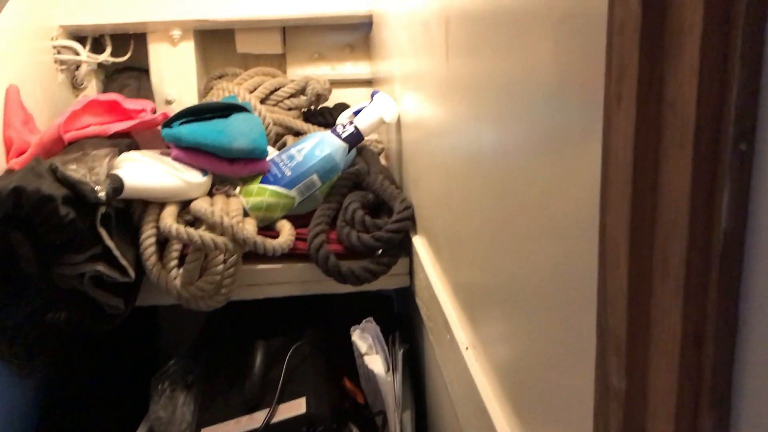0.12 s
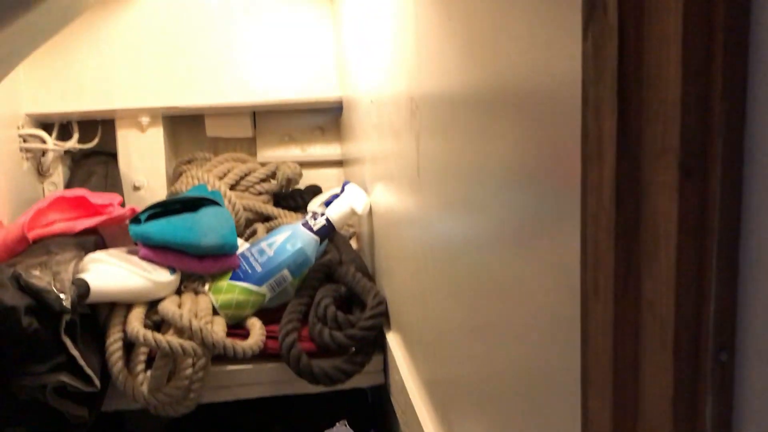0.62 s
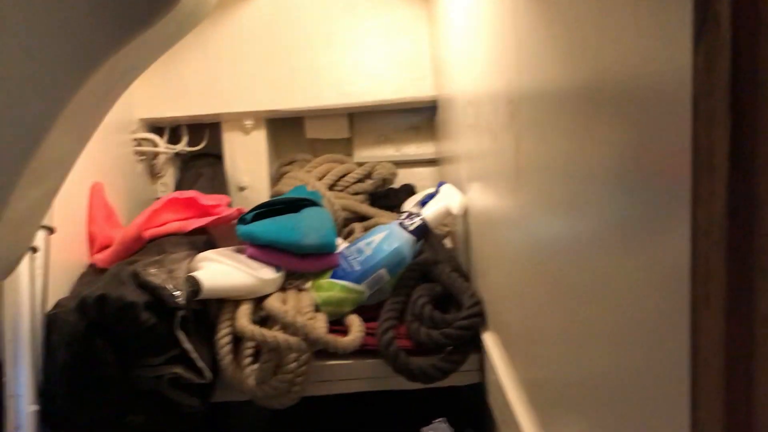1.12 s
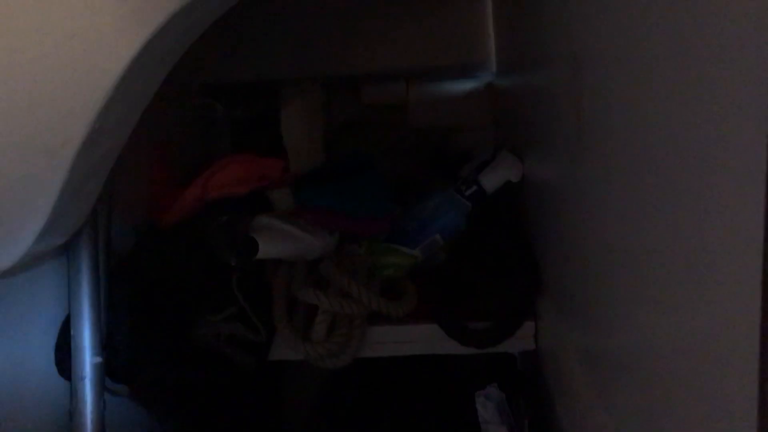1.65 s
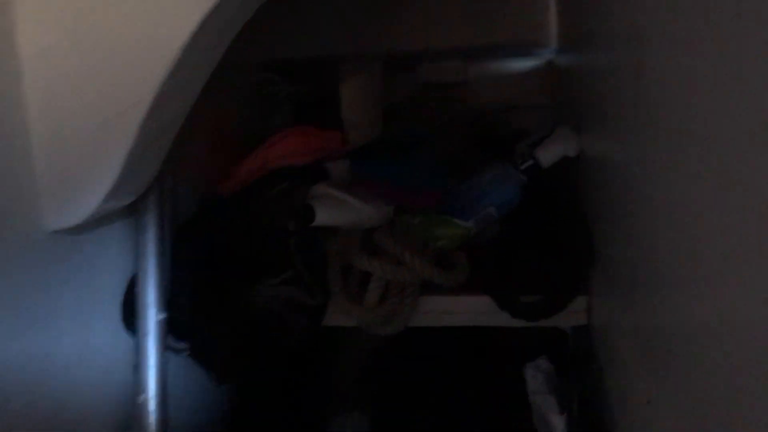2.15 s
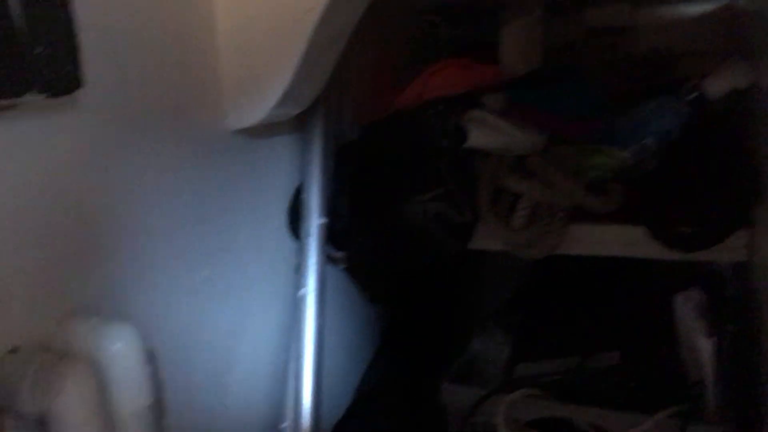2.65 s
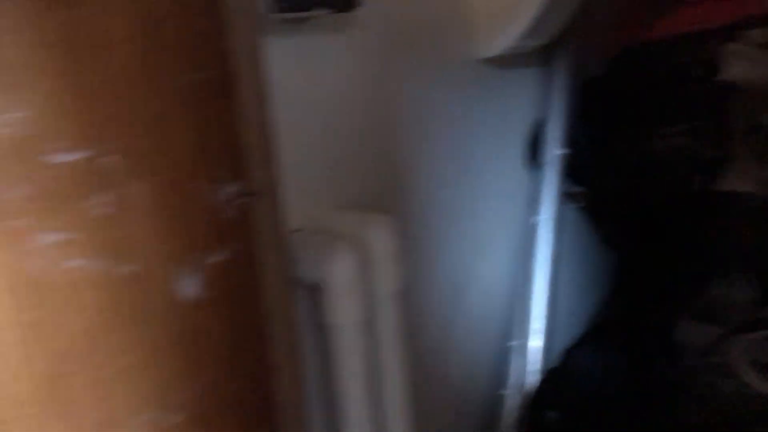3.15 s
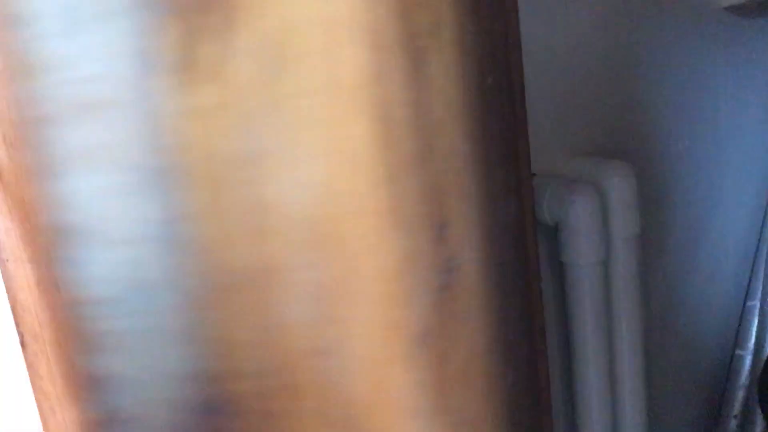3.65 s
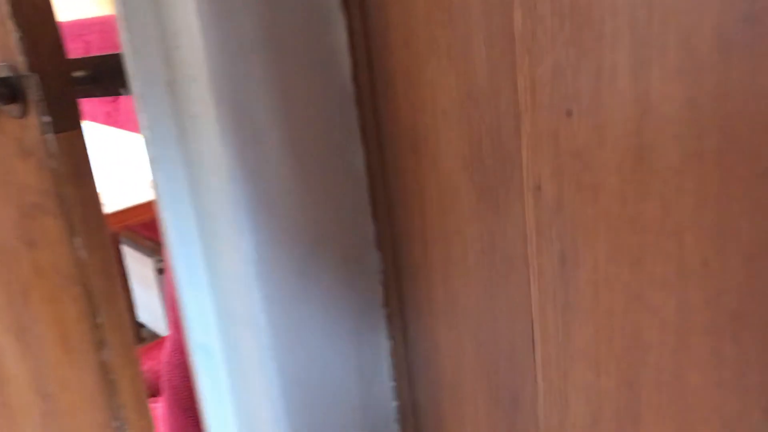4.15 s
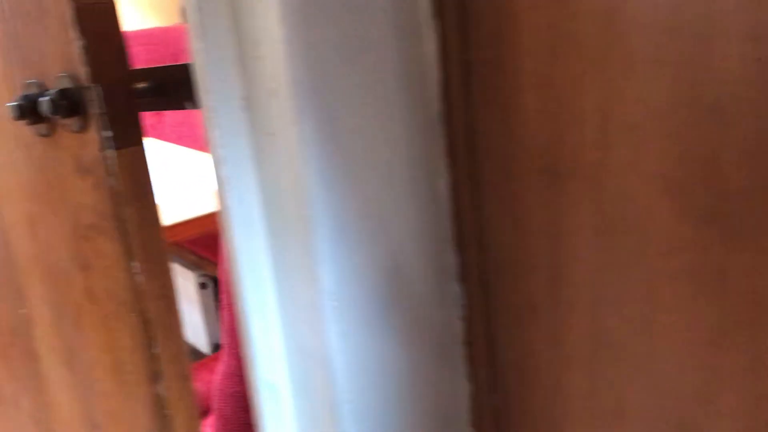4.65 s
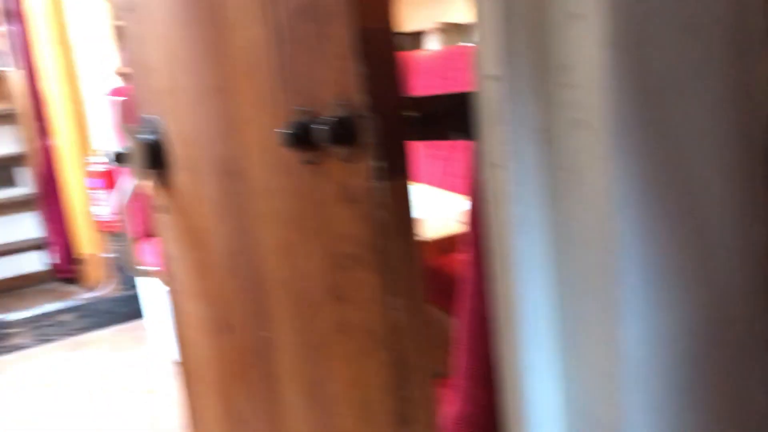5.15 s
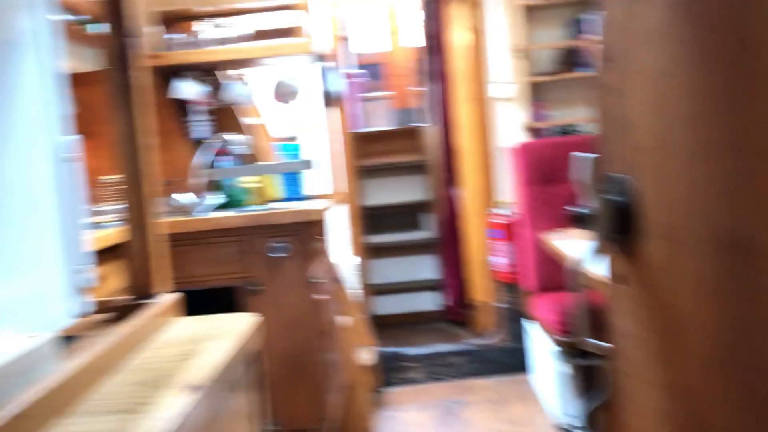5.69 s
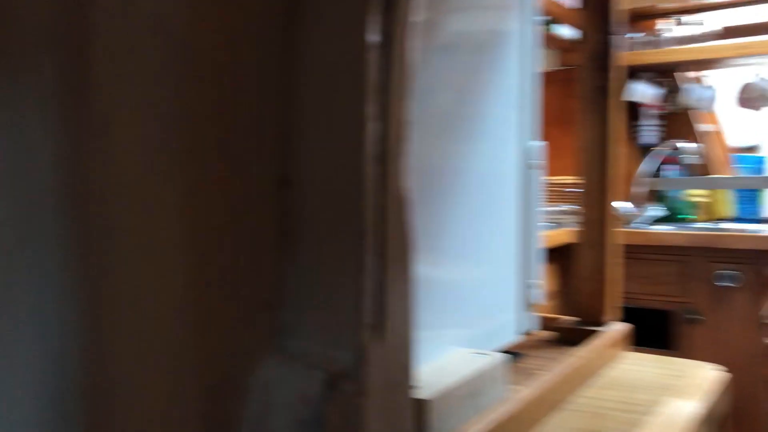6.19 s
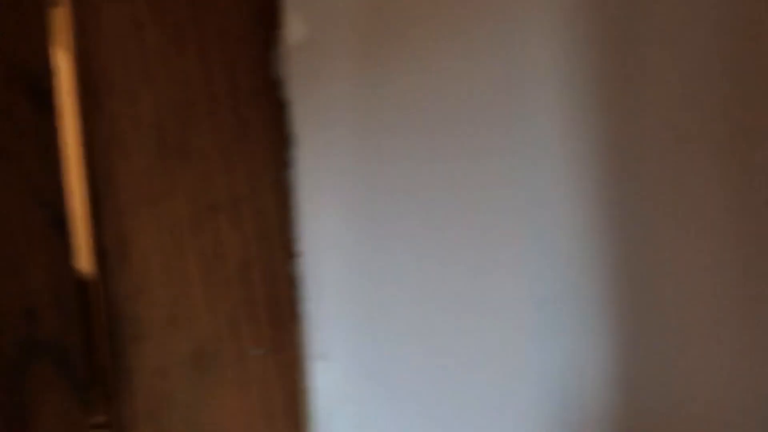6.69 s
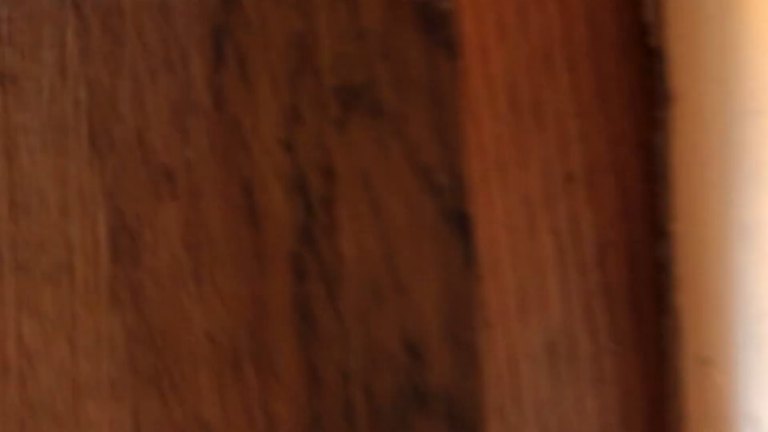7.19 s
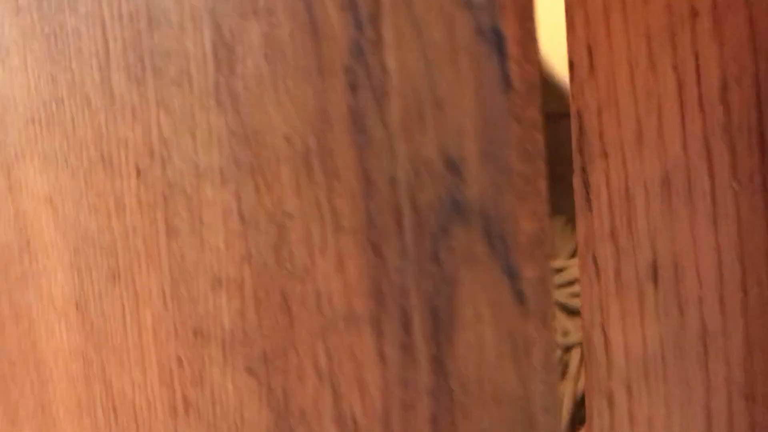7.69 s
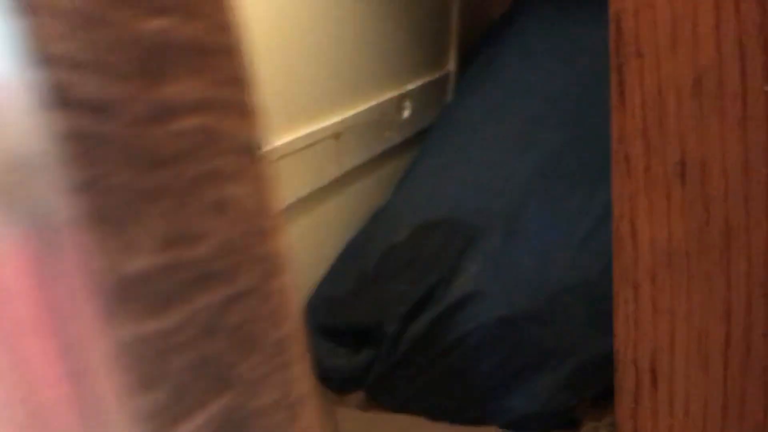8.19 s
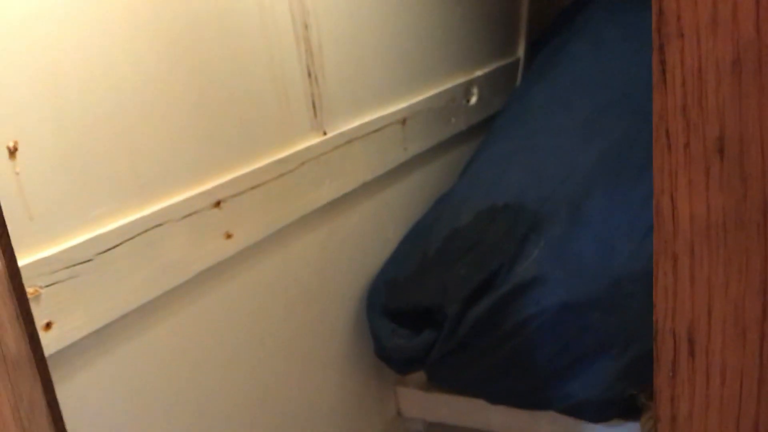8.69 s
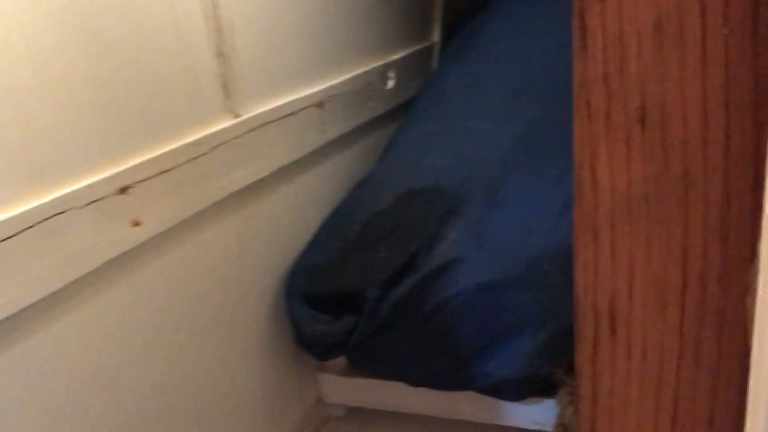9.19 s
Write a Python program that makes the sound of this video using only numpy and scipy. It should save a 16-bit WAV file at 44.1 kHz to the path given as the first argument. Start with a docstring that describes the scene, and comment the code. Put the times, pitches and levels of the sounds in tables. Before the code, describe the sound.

In a cramped wooden boat cabin, a light switch clicks, then doors bang and thud heavily, with rattles, fumbling knocks and a locker creaking open.

```python
"""Knocks and clicks of doors, a light switch, latches and joinery in a cramped wooden boat cabin: noise
bursts shaped by the wood's resonances, plus decaying modes of the door or locker. Panels thud as damped
sines; rubbing, scraping, cloth, rattle after some blows and shifting weight are coloured noise under
gain curves. A wavering mains hum of four sines and the microphone's hiss lie underneath."""
import sys
import numpy as np
from scipy import signal
from scipy.fft import rfft, irfft, next_fast_len
from scipy.io import wavfile
from scipy.ndimage import uniform_filter1d, map_coordinates

SR = 44100
rng = np.random.default_rng(int(sys.argv[2]) if len(sys.argv) > 2 else 0)


def generate_wav(signal):
    """Clip the signal to [-1, 1] and save it as 16-bit WAV at the path in sys.argv[1]."""
    frames = np.transpose(np.atleast_2d(signal))
    scaled = np.clip(frames, -1, 1) * 32767
    pcm = np.round(scaled).astype(np.int16)
    wavfile.write(sys.argv[1], SR, pcm)


def undo_db(level):
    """Turn decibels back into plain size, where 20 dB means ten times bigger."""
    steps = np.asarray(level, float) / 20
    return 10 ** steps


N = 411453

# Weight shifting on the hull. Each row: time in seconds, rumble level in dB.
SHIFTING = [(0, -61), (1.2, -61.5), (2.6, -60), (3.3, -61.5), (4.4, -56), (4.5, -34.5), (4.9, -51.5),
            (5.3, -47.5), (5.7, -51.5), (6.2, -52), (6.9, -42), (7.2, -54.5), (8.2, -59.5), (9.33, -57.5)]
# How busy the hands are. Each row: time in seconds, rubbing level in dB.
HANDLING = [(0, -70.5), (0.4, -75.5), (2.6, -75), (3.4, -70), (4.6, -71), (4.9, -76), (5.2, -72),
            (5.5, -60), (5.85, -65), (6.3, -64.5), (7.1, -64.5), (7.5, -66), (8.3, -70.5), (9.33, -69)]
# Rubbing and swishing strokes, and the rattle that follows some blows. Each row: peak in seconds,
# swell in seconds, fade in seconds, rubbing level in dB, swish level in dB.
STROKES = [(.255, 0.051, 0.18, -73.5, -69), (2.87, 0.069, .15, -73, -72.5), (3.58, .2, .06, -66, -64.5),
           (3.68, 0.049, 0.075, -65, -74), (3.8, 0.036, 0.026, -64, -66), (3.96, 0.037, .04, -69.5, -70),
           (4.03, 0.022, 0.023, -67, -75), (4.16, 0.093, 0.088, -70.5, -64),
           (4.795, .015, 0.096, -60.5, -64.5), (5.04, 0.079, .12, -55, -70), (5.36, .06, .17, -50, -65),
           (6.02, .15, 0.13, -68, -81), (6.145, .012, 0.058, -68, -65), (6.218, .02, .012, -70, -65),
           (6.62, 0.15, .25, -57, -70), (7.709, .05, .05, -68.5, -73), (7.9, .2, .09, -57, -64),
           (8.12, 0.12, .08, -64, -69), (8.84, .04, .07, -61, -60)]
# Spectrum of the hull rumble. Each row: frequency in Hz, relative density in dB per Hz.
RUMBLE_SPECTRUM = [(22, -1), (45, -1.5), (110, 2.5), (160, -8), (270, -8), (340, -14), (600, -42)]
# Spectrum of the rubbing. Each row: frequency in Hz, relative density in dB per Hz.
RUB_SPECTRUM = [(250, -17), (400, 1.5), (1200, -2.5), (2500, -4.5), (5000, -11.5), (8000, -22.5)]
# Spectrum of the swish. Each row: frequency in Hz, relative density in dB per Hz.
SWISH_SPECTRUM = [(3000, -15), (6000, 3), (8000, 3), (10500, 3.5), (12500, 3), (15900, 2.5)]
# Resonances of joinery and fittings. Each row: frequency in Hz, width in Hz, gain in dB.
WOOD_RESONANCES = [(510, 23, 1.5), (657, 12, 5.5), (965, 27, 4), (1200, 350, 1.5), (1597, 33, 2.5),
                   (2130, 400, -1), (2610, 480, -3.5), (3520, 890, 0), (6200, 540, 3), (8700, 600, -1),
                   (12000, 340, -1.5)]
# Mains hum. Each row: frequency in Hz, rms level in dB, change in dB once out of the fore cabin.
HUM = [(48.3, -78.5, 4), (100.3, -66.5, 4.5), (200.2, -66.5, -12.5), (301, -86, 6)]
# Way out of the fore cabin. Each row: time in seconds, share of the way (0 to 1).
LEAVING = [(4.2, 0.0089), (6.5, 1)]
# Spectrum of the microphone hiss. Each row: frequency in Hz, relative density in dB per Hz.
HISS_SPECTRUM = [(300, -5), (600, 9), (1500, -10), (4900, -1), (7000, -21), (10500, -20), (14800, -20),
                 (15900, -22)]
# Thuds into the panels. Each row: start in seconds, relative level in dB, deep pitch in Hz,
# hollow pitch in Hz, relative hollow level in dB.
THUDS = [(0.001, -38.5, 83, 272, -6.5), (0.174, -33, 118.4, 255, -11), (2.064, -41.5, 104, 176, -9),
         (2.6, -31, 45.6, 257, -8), (2.66, -42, 60, 267, -8), (3.85, -40.5, 85, 229, -15),
         (4.471, -4.5, 80.5, 138, -8.5), (4.54, -24, 88.8, 153, -12), (4.592, -15, 72, 145, -18.5),
         (4.647, -19.5, 72, 205, -27), (4.786, -26.5, 111.6, 144, -13.5), (5.031, -30.5, 114, 142, -6.5),
         (5.078, -31, 96, 330, 0), (5.319, -5, 70.5, 137, -18.5), (5.342, -11, 68.6, 165, -12),
         (5.4, -23.5, 61.3, 158, -9), (5.442, -19, 63.3, 142, -28), (5.489, -21, 51.7, 153.5, -15),
         (5.58, -25.5, 80, 152, -15), (5.649, -31.5, 62.6, 150, -20), (5.828, -22.5, 79, 300, -18.5),
         (5.885, -41, 94.2, 142, -3), (6.024, -33.5, 91, 138, -9), (6.087, -40, 86.1, 168, -8),
         (6.234, -25.5, 98, 145, -21), (6.29, -26.5, 66.7, 297, -35), (6.628, -22.5, 99.6, 158, -22),
         (6.667, -31, 96, 143, -36), (6.734, -14.5, 85, 172, -31), (6.786, -32, 81.4, 258, -17),
         (6.828, -28, 83.4, 144.8, -12), (6.884, -12.5, 102.5, 278, -13), (6.949, -41, 86.1, 256, -12),
         (6.99, -40, 117, 151, -3), (7.032, -22.5, 116.4, 155, 1), (7.385, -47, 100, 235, -4),
         (7.432, -35.5, 111, 231, -6), (7.549, -47, 115, 247, -3.5), (7.813, -28.5, 75.6, 320, -22.5)]
# Door and bulkhead panel modes. Each row: frequency in Hz, relative level in dB, free t60 in seconds.
PANEL_MODES = [(48, -7, 0.45), (59.1, 0.5, 0.89), (64.6, 2, 0.56), (80.4, 1.5, 0.42), (88.5, 1, 0.32),
               (97.8, 1.5, 0.35), (125.4, -1, 0.35), (145.2, -0.5, 0.51), (152, 3, 0.17), (205, 12, 0.15),
               (222, -17, 0.11), (270.6, 3.5, 0.28), (320.8, 8, 0.14), (385, -5.5, 0.19)]
# Knocks and clicks. Each row: start in seconds, relative level in dB, relative hollow body level in dB,
# relative metal edge level in dB, strongest ring in Hz.
KNOCKS = [(0.0014, -40.5, 0.5, -24.5, 1063), (0.1788, -43, 5, -34, 1025), (0.37, -51, -30, -20, 970),
          (0.7853, -44, -26, -20, 1390), (0.921, -49.5, -27, -33, 1373), (1.6048, -57, -18, -7, 1640),
          (1.6856, -29.5, -4.5, -19, 1590), (1.8893, -52.5, -12, -19, 1780),
          (2.0643, -35.5, -7, -22.5, 1094), (2.0824, -45.5, -4, -23, 1430), (2.5859, -42, -2.5, -21, 840),
          (2.5943, -36, -8, -44, 1040), (2.6165, -46.5, 0, -17, 1050), (2.6859, -42, -9, -20, 1040),
          (2.7244, -41.5, -3.5, -19.5, 1080), (2.8346, -57.5, -13, -20, 1020), (3.8407, -28, -7, -23, 975),
          (4.2158, -26.5, -20.5, -23, 993), (4.4556, -33, 2.5, -5, 725), (4.4606, -7, -17, -26, 1266),
          (4.4999, -22.5, -3, -25, 1960), (4.7375, -34.5, -8, -24, 848), (4.7864, -37, -12, -28, 976),
          (5.006, -15.5, -16, -16, 4010), (5.0267, -17.5, -6.5, -22.5, 660), (5.048, -19, -2, -8, 601),
          (5.1353, -31.5, -13.5, -30, 659), (5.1915, -45, -22, -20, 1095), (5.2135, -28, -17, -20.5, 1290),
          (5.2988, -21, -5, -20, 657), (5.3434, -18, -7.5, -18, 2000), (5.4263, -43, -1, -22, 620),
          (5.5026, -32, -13, -20.5, 725), (5.5341, -31, -21, -17.5, 1296), (5.581, -27, -18, -15, 1300),
          (5.644, -36, -25, -18, 1310), (5.681, -37.5, -30, -20, 620), (5.7606, -52, -19, -6, 5930),
          (5.791, -39, -36, -20, 2460), (5.8173, -38.5, -4.5, -15.5, 1040), (5.8822, -37.5, 2.5, -2, 600),
          (5.956, -48.5, -20, -11, 726), (6.0011, -39.5, 2, -17, 1380), (6.0392, -34, -3, -22, 926),
          (6.0984, -39, -6.5, -4.5, 763), (6.227, -42.5, -9, -18, 1520), (6.2884, -44, -10, -19, 1474),
          (6.425, -33.5, -15, -10.5, 3170), (6.4507, -25.5, -39, -6.5, 4265), (6.4696, -34, -19, -10, 4460),
          (6.4807, -23.5, -11, -15.5, 1212), (6.589, -26, -14, -2, 9000), (6.627, -39.5, -7, -29, 596),
          (6.68, -43, -30, -16, 4370), (6.7312, -20, -8.5, -18, 1440), (6.779, -34, -4, -36, 610),
          (6.8346, -40, -16, -20.5, 1200), (6.8845, -27.5, -2.5, -43, 1645), (6.8929, -36.5, 0.5, -54, 766),
          (7.0276, -12, -10, -13.5, 1135), (7.0358, -16, -5.5, -15, 663), (7.2623, -34, -15, -17.5, 3630),
          (7.3859, -57.5, 6.5, -16, 1400), (7.486, -56, -18, -11, 4500), (7.5532, -48, -8, -17, 692),
          (7.6092, -44, -10, -36, 1060), (7.6266, -50, -14, -6.5, 740), (7.651, -46, -22, -20, 950),
          (7.7598, -41.5, -18, -14.5, 1680), (7.8888, -41, -30, -12, 740), (8.1272, -41, -15, -15.5, 2150),
          (8.1948, -38, -37, -21, 2265), (8.242, -47.5, -11, -32, 1017), (8.2913, -52.5, -17, -26, 2120),
          (8.839, -40, -26, -12.5, 3000), (9.0668, -52, -26, -21, 2130), (9.1297, -49, -1, -41, 657)]
# Quick repeats of a loose part: a dry creak, then the door rebounding on its stop. Each row: first start
# in seconds, spacing in seconds, first relative level in dB, loss per repeat in dB, ring in Hz.
CHATTER = [(0.4028, .028, -55, 1, 946), (4.5434, .0452, -36, 3, 730)]
# Knock spectrum of the first door. Each row: frequency in Hz, relative density in dB per Hz.
DOOR_SPECTRUM = [(250, 5), (400, 3), (1000, -3.5), (1800, -4.5), (2800, -5), (6000, -16.5), (10000, -23),
                 (16000, -32.5)]
# Knock spectrum of the locker door. Each row: frequency in Hz, relative density in dB per Hz.
LOCKER_SPECTRUM = [(250, 0), (450, -4), (1000, -3), (1800, -0.5), (2800, -2.5), (6000, -12), (10000, -14),
                   (16000, -26.5)]
# Modes of the first door and its frame. Each row: frequency in Hz, relative level in dB, t60 in seconds.
DOOR_MODES = [(454, -20, .12), (601.4, 11, 0.088), (668, -3, 0.45), (810, 0, 0.095), (926, -19, 0.14),
              (1040, 10, 0.16), (1190, 12.5, 0.048), (1337, -16, 0.12), (1576, 4, .1), (1780, 16, 0.057),
              (1960, -11, 0.097), (2366, 8, 0.094), (2800, -13, .06), (3930, -15, 0.036)]
# Modes of the locker door. Each row: frequency in Hz, relative level in dB, t60 in seconds.
LOCKER_MODES = [(448, -11, .12), (657, 8, 0.18), (790, -9, 0.086), (900, -8.5, 0.088), (1040, 10.5, 0.057),
                (1225, 9.5, 0.1), (1187, -21, .1), (1480, -16, 0.093), (1640, 10.5, 0.12),
                (1760, -27, 0.088), (2080, -9, .09), (2480, -9, .07), (2800, -15, .06), (3360, -9, .07),
                (4500, -4, .07)]
# Rubbing and scraping in a narrow band: hands on wood, a scrape or hinge near 8.1 s. Each row:
# peak in seconds, swell in seconds, fade in seconds, level in dB, centre in Hz.
NARROW_RUBS = [(0.43, .08, .12, -77, 1350), (2.9, .08, .2, -76, 1500), (3.45, .15, .15, -74, 760),
               (3.6, .2, .2, -73, 1250), (5.45, .1, .3, -64, 1100), (7.18, .1, .1, -74, 1450),
               (7.6, 0.092, .15, -72, 1500), (7.91, .15, .07, -60, 3100), (8.09, .1, .1, -62, 1300),
               (8.11, .06, .07, -64, 470)]
# Spectrum of the narrow band. Each row: share of the centre pitch, relative density in dB per Hz.
NARROW_SPECTRUM = [(.52, -29), (.78, -3), (1, 2), (1.22, -9), (1.7, -32)]
# Dips of the microphone port. Each row: frequency in Hz, width in Hz, gain in dB.
MIC_DIPS = [(4880, 260, -3.5), (7720, 1040, -2.5), (10430, 950, -6)]

LOCKER_FROM_S = 5.75
# nominal knock t60 at 1 kHz, exponent of its fall with pitch, growth per dB of hollow body
NOMINAL_T60_S, PITCH_DAMPING, HOLLOW_GROWTH_PER_DB = 0.14, 0.23, 0.0045
TICK_LOWEST_DB, TICK_SPREAD_DB, TICK_CENTRE_HZ = -61.5, 4, 1500
# share of the free panel t60 left by a blow at 0 dB, and its growth per dB of a lighter blow
PRESSED_RING, FREER_PER_DB = 0.48, 0.0095
CLOTH_DB, CLOTH_FOLLOWS = -75, 0.47  # cloth level when rubbing is at -69.5 dB; its share of the swings
SWELL_FADE_DB = 16  # fall from the peak over one swell or fade time


def unit(x):
    """Scaled to rms 1 along time."""
    return x / np.sqrt(np.mean(x ** 2, -1, keepdims=True) + 1e-20)


def along(points, hz):
    """Interpolates (Hz, value) points on a log frequency axis."""
    f, v = np.transpose(points)
    return np.interp(np.log(hz + 1), np.log(f + 1), v, right=-120)


def bumps(hz, resonances):
    """Gain of (Hz, width in Hz, dB) humps or dips."""
    return undo_db(sum(db / (1 + ((hz - centre) / width * 2) ** 2) for centre, width, db in resonances))


def wobble(knots_per_s):
    """A smooth random curve."""
    knots = rng.standard_normal(int(N * knots_per_s / SR) + 4)
    return map_coordinates(knots, [np.arange(N) * knots_per_s / SR])


def coloured(x, gain):
    """x times a gain that depends on frequency, at rms 1."""
    size = x.shape[-1]
    return unit(irfft(rfft(x) * gain(np.fft.rfftfreq(size, 1 / SR)), size))


def noise(spectrum, grit_db, resonances=()):
    """Coloured noise; grit makes it flicker like many small catches."""
    size = next_fast_len(N)
    white = rng.standard_normal(size)
    white[:N] *= undo_db(grit_db * (wobble(300) + wobble(40)))
    return coloured(white, lambda hz: undo_db(along(spectrum, hz)) * bumps(hz, resonances))[:N]


def laid_out(start_s, sounds):
    """Sums the rows of sounds, each from its own start."""
    at = np.round(start_s * SR).astype(int)[:, None] + np.arange(sounds.shape[1])
    return np.bincount(at.ravel(), sounds.ravel(), N + SR)[:N]


def swell_and_fade(peak_s, swell_s, fade_s):
    """Gain of one burst: it builds up, holds near its peak and dies away."""
    t = np.arange(N) / SR
    away = np.where(t < peak_s, (peak_s - t) / abs(swell_s), (t - peak_s) / abs(fade_s))
    return undo_db(-SWELL_FADE_DB * np.minimum(away, 3) ** 2.17)


def handling():
    """Noise under gain curves: weight shifting on the hull, rubbing, swishing, rattle after some blows."""
    t = np.arange(N) / SR
    rumble = undo_db(np.interp(t, *np.transpose(SHIFTING)))
    busy_db = np.interp(t, *np.transpose(HANDLING))
    rub = undo_db(busy_db)
    swish = undo_db(CLOTH_DB + CLOTH_FOLLOWS * (busy_db + 69.5))
    uneven_db = 1.35 * wobble(22)
    for peak_s, swell_s, fade_s, rub_db, swish_db in STROKES:
        burst = undo_db(uneven_db) * swell_and_fade(peak_s, swell_s, fade_s)
        rub = np.hypot(rub, burst * undo_db(rub_db))
        swish = np.hypot(swish, burst * undo_db(swish_db))
    hull = rumble * noise(RUMBLE_SPECTRUM, grit_db=1.4)
    rubbing = rub * noise(RUB_SPECTRUM, grit_db=1.5, resonances=WOOD_RESONANCES)
    swishing = swish * noise(SWISH_SPECTRUM, grit_db=1.0)
    return hull + rubbing + swishing


def hum():
    """Mains-driven gear buzzes near multiples of the supply, wavering; the balance shifts between cabins."""
    t = np.arange(N) / SR
    way_out = np.interp(t, *np.transpose(LEAVING))
    total = 0
    for hz, db, change_db in HUM:
        level = undo_db(db + change_db * way_out + 1.2 * wobble(4.2))
        total = total + level * np.sqrt(2) * np.sin(2 * np.pi * hz * t + 0.6 * wobble(1.5))
    return total


def hiss():
    """The microphone's own noise, steady but for a slight flicker."""
    return undo_db(-83.0) * noise(HISS_SPECTRUM, grit_db=-0.8)


def thuds():
    """A soft blow rings the panel modes near its deep and its hollow pitch, the others faintly."""
    start_s, db, deep_hz, hollow_hz, hollow_db = np.transpose(THUDS)[:, :, None]
    free_share = np.clip(PRESSED_RING - FREER_PER_DB * db, 0.1, 3)
    t = np.arange(SR // 2) / SR
    ring = 0
    for hz, mode_db, t60_s in PANEL_MODES:
        near = lambda centre_hz, octaves: undo_db(mode_db - 8.4 * (np.log2(hz / centre_hz) / octaves) ** 2)
        gain = near(deep_hz, 0.31) + undo_db(hollow_db + 7.0) * near(hollow_hz, 0.22) + undo_db(mode_db - 24.0)
        envelope = undo_db(-60 * t / (t60_s * free_share)) * (1 - np.exp(-t * hz / 0.85))
        ring = ring + gain * envelope * np.sin(2 * np.pi * hz * t)
    return laid_out(start_s[:, 0], undo_db(db - 6.5) * ring * np.cos(np.pi * t) ** 2)


def contacts():
    """All knocks: the single ones, the quick repeats and faint joinery ticks at random moments."""
    repeats = [(start_s + k * gap_s, db - k * loss_db, body_db, edge_db, hz)
               for k in range(4)
               for (start_s, gap_s, db, loss_db, hz), body_db, edge_db in zip(CHATTER, (-23, 2), (-21, -40))]
    ticks = [(when * N / SR, TICK_LOWEST_DB + TICK_SPREAD_DB * size, -17, -21,
              TICK_CENTRE_HZ * 2 ** (2 * pitch - 1))
             for when, size, pitch in rng.random((8, 3))]
    return np.array(KNOCKS + repeats + ticks)


def ringing(modes, t, body_db, ring_hz):
    """Every blow rings the same modes at new strengths, most near the part that was hit."""
    hz, db, t60_s = np.transpose(modes)
    near_db = 8 / (1 + (np.log2(hz / ring_hz) / 0.067) ** 2)
    chance_db = 2.8 * rng.standard_normal((len(ring_hz), len(hz)))
    weight = undo_db(db + near_db + (body_db + 11.0) * (hz < 1000) + chance_db)
    weight = weight / np.sqrt(np.sum(weight ** 2 * (hz > 1000), 1, keepdims=True))
    return weight @ (undo_db(-60 * t / t60_s[:, None]) * np.sin(2 * np.pi * hz[:, None] * t))


def knocks():
    """A crack, then wood resonances and door modes dying away in the small cabin, high rings sooner."""
    start_s, db, body_db, edge_db, ring_hz = contacts().T[:, :, None]
    t = np.arange(2 ** 14) / SR
    at_door = start_s < LOCKER_FROM_S
    white = rng.standard_normal((len(start_s), len(t)))

    def struck(hz):
        """Gain of the wood; the part that was hit rings most."""
        spectrum_db = np.where(at_door, along(DOOR_SPECTRUM, hz), along(LOCKER_SPECTRUM, hz))
        return undo_db(spectrum_db) * bumps(hz, WOOD_RESONANCES) * bumps(hz, [(ring_hz, 0.091 * ring_hz, 9)])

    # a soft contact is dull throughout; light clicks are crisper than heavy blows
    soft = lambda hz: undo_db(0.4 * (edge_db + 18.5) * np.log2(hz / 1500 + 0.1))
    light = lambda hz: undo_db(-0.3 * (db + 22.5) * np.log2(hz / 8000 + 0.1))
    lowpass = lambda hz, corner_hz: 1 / (1 + (hz / corner_hz) ** 6)
    highpass = lambda hz, corner_hz: 1 / (1 + (corner_hz / (hz + 1)) ** 6)
    body = coloured(white, lambda hz: struck(hz) * lowpass(hz, 1000))
    middle = coloured(white, lambda hz: struck(hz) * soft(hz) * highpass(hz, 1000) * lowpass(hz, 6000))
    edge = coloured(white, lambda hz: struck(hz) * light(hz) * highpass(hz, 6000))

    pitch_factor = (ring_hz / 1000) ** -PITCH_DAMPING
    life_s = np.clip(NOMINAL_T60_S * pitch_factor * (1 + HOLLOW_GROWTH_PER_DB * body_db), 0.01, 0.6)
    fade = lambda longer, rise_s: undo_db(-60 * t / (longer * life_s)) * (1 - np.exp(-t / rise_s))
    crack = lambda size: 1 + size * undo_db(-60 * t / 0.02)
    sound = undo_db(body_db + 9) * body * fade(1.11, 0.002)
    sound = sound + crack(0.72) * middle * fade(0.87, 0.0012)
    sound = sound + undo_db(edge_db + 5.0) * crack(2.2) * edge * fade(0.96, 0.00031)
    # walls carry the tail on
    cabin = 1 + undo_db(-25.5 + 60 * t / life_s - 60 * t / np.maximum(0.28, life_s))
    # loose parts chatter on
    rattle = undo_db(1.59 * unit(uniform_filter1d(rng.standard_normal(white.shape), size=160)))

    modes = np.where(at_door, ringing(DOOR_MODES, t, body_db, ring_hz),
                     ringing(LOCKER_MODES, t, body_db, ring_hz))
    own_note = undo_db(-60 * t * np.sqrt(ring_hz / 1000) / 0.12) * np.sin(2 * np.pi * ring_hz * t)
    tonal = (modes + 1.36 * own_note) * fade(1.43, 0.0026)
    return laid_out(start_s[:, 0], undo_db(db - 13.5) * (sound * cabin * rattle + tonal))


def narrow_rubbing():
    """Rubbing and scraping in a narrow band: noise peaking at a centre pitch."""
    return sum(undo_db(db) * swell_and_fade(peak_s, swell_s, fade_s)
               * noise(np.multiply(NARROW_SPECTRUM, [hz, 1]), grit_db=1.5)
               for peak_s, swell_s, fade_s, db, hz in NARROW_RUBS)


def scene():
    """Everything reaches one microphone."""
    return (handling() + hum() + thuds() + knocks() + narrow_rubbing())[None]


def roll_off(x):
    """The treble ends steeply here."""
    return signal.sosfilt(signal.butter(12, 16800, fs=SR, output="sos"), x)


def record(dry):
    """Adds microphone hiss, a bass roll-off around 42 Hz, dips of the port and a band limit."""
    size = next_fast_len(N + SR)
    hz = np.fft.rfftfreq(size, 1 / SR)
    bass_cut = -hz ** 2 / (42 ** 2 - hz ** 2 + 1.3j * hz * 42)
    response = bass_cut * bumps(hz, MIC_DIPS) * (hz < 16700)
    mix = irfft(rfft(dry + hiss(), size) * response, size)[:, :N]
    return roll_off(mix)


dry = scene()
out = record(dry)
generate_wav(out)
```